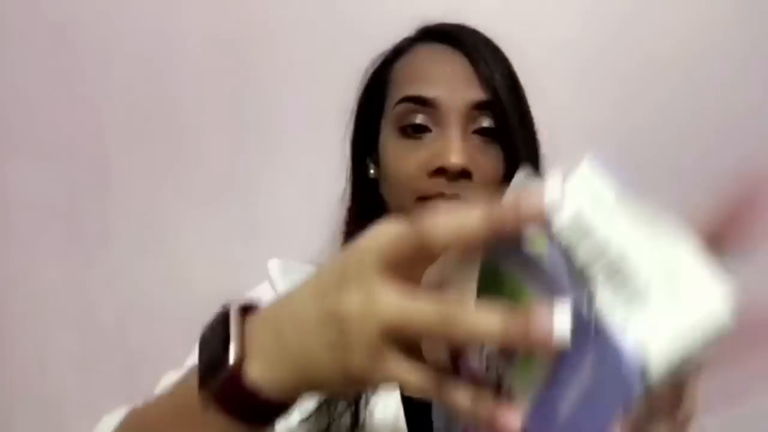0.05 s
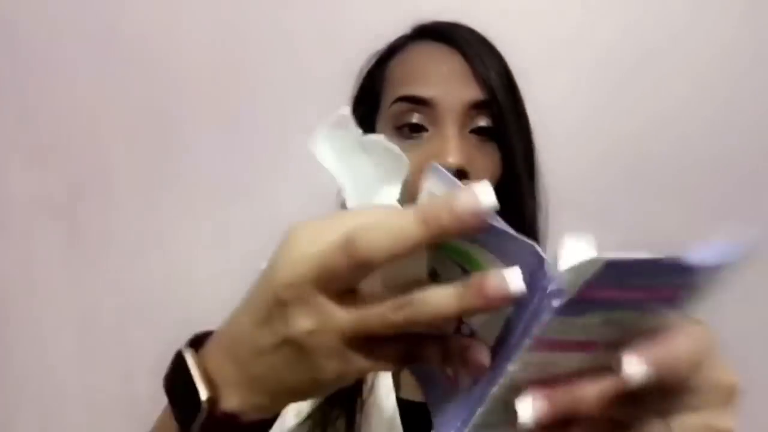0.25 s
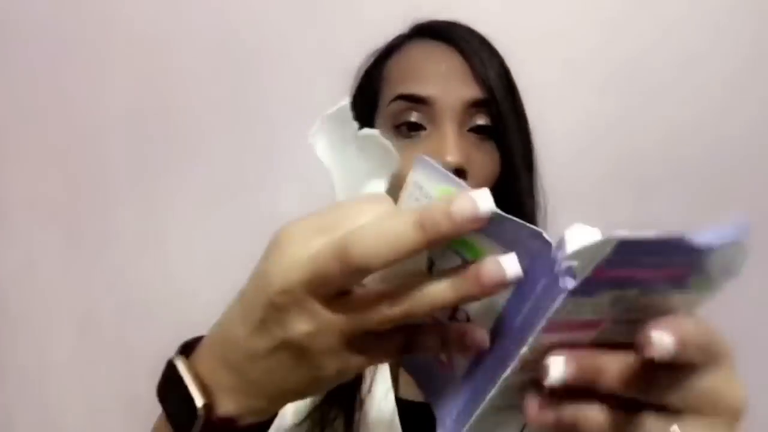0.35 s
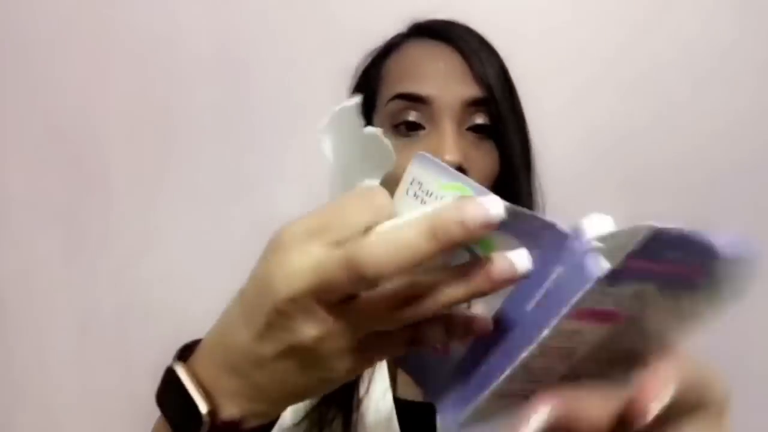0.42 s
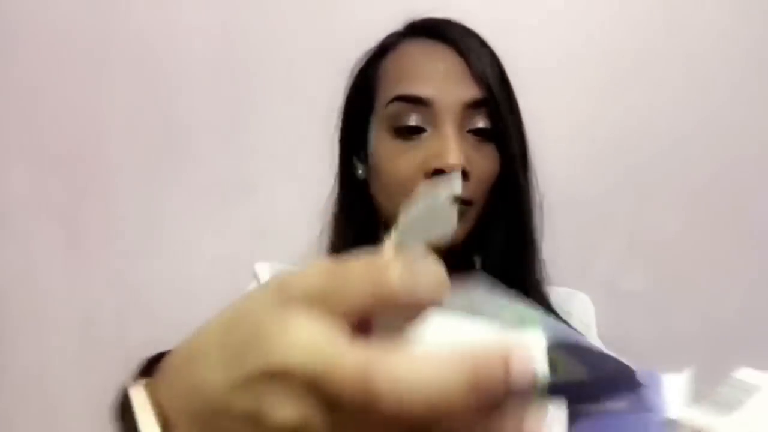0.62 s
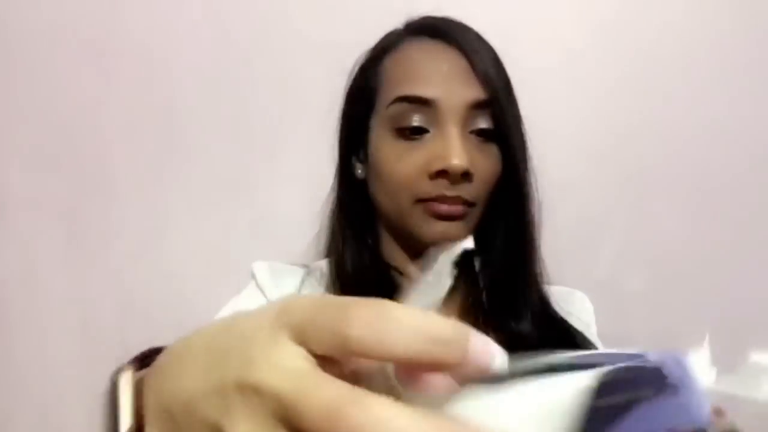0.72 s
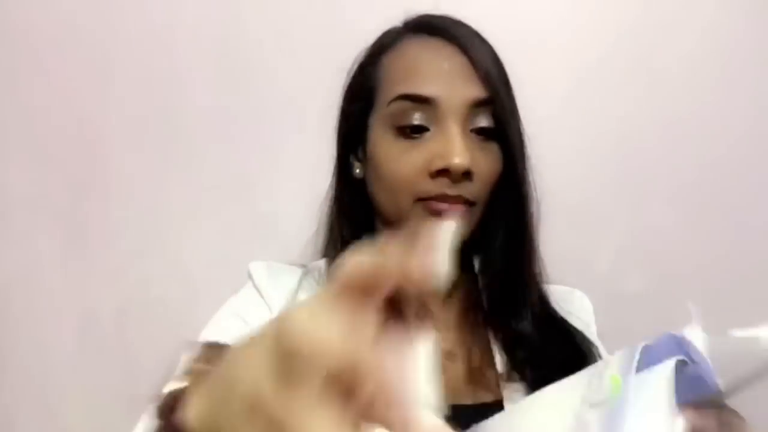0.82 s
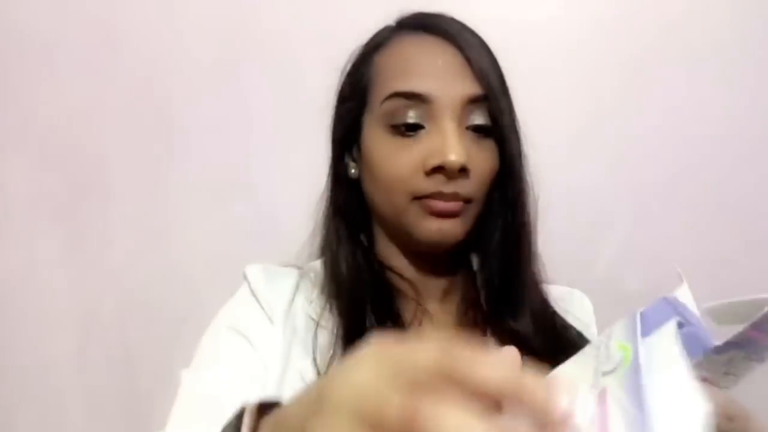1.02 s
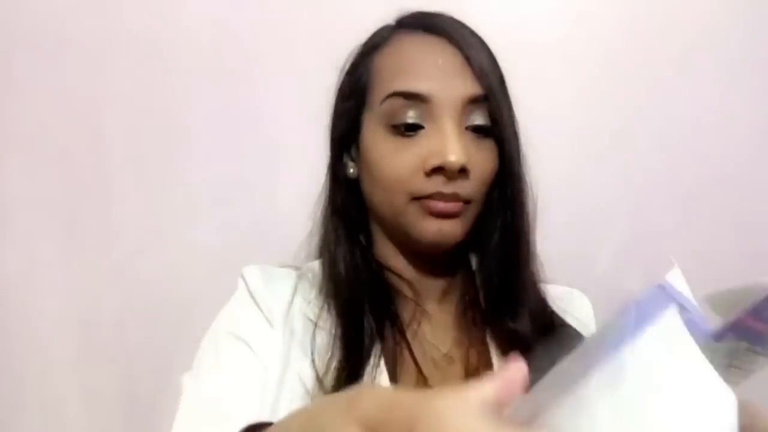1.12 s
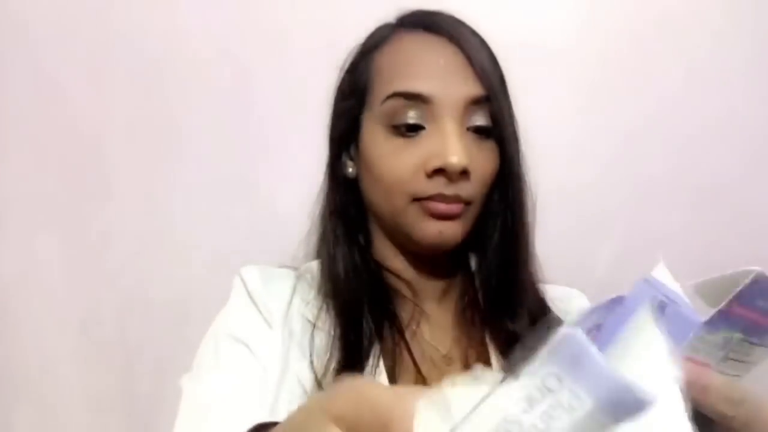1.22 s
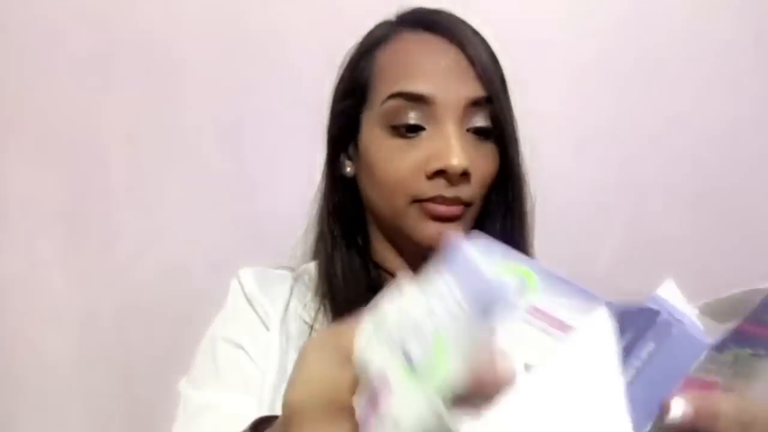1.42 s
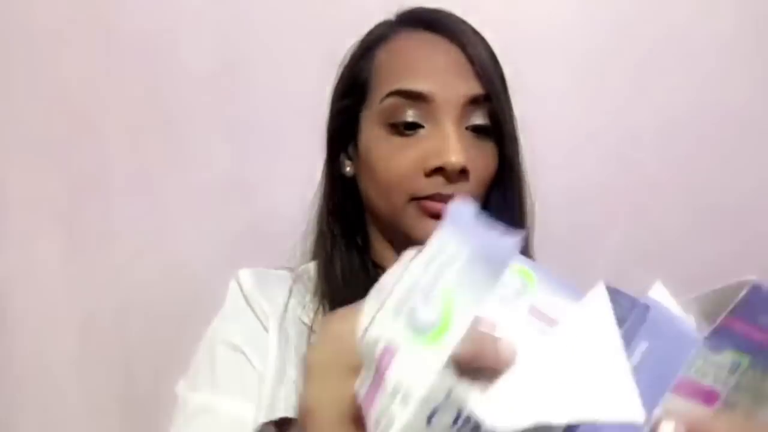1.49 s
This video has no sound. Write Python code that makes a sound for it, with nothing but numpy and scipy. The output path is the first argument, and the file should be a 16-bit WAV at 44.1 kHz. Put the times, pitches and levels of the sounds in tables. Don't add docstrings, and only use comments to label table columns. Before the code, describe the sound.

Thin cardboard carton torn open by hand, one loud snapping pop, then light crinkling and ticks

```python
import sys
import numpy as np
from scipy import signal
from scipy.fft import rfft, irfft, next_fast_len
from scipy.io import wavfile
from scipy.ndimage import uniform_filter1d, map_coordinates

SR = 44100
rng = np.random.default_rng(int(sys.argv[2]) if len(sys.argv) > 2 else 0)


def wav_out(sig):
    wavfile.write(sys.argv[1], SR, np.round(np.clip(np.atleast_2d(sig).T, -1, 1) * 32767).astype(np.int16))


def ratio(d):
    e = np.asarray(d, float) / 20
    return 10 ** e


N = 68355


def unit(x):
    return x / np.sqrt(np.mean(x ** 2) + 1e-20)


def along(points, hz):
    f, v = np.transpose(points)
    return np.interp(np.log(hz + 1), np.log(f + 1), v)


def wobble(rate):
    return map_coordinates(rng.standard_normal(2000), [np.arange(N) * rate / SR])


def filtered(x, response):
    m = next_fast_len(len(x) + 8192)
    return irfft(rfft(x, m) * response(np.fft.rfftfreq(m, 1 / SR)), m)[:len(x)]


def patchy(patchy_db):
    z = signal.stft(rng.standard_normal(N + 512), nperseg=256)[2]
    field = uniform_filter1d(rng.standard_normal(z.shape), 6, axis=0)
    field = uniform_filter1d(field, 8, axis=1)
    return signal.istft(z * ratio(patchy_db * unit(field)), nperseg=256)[1][:N]


def add(track, s, sound):
    track[round(s * SR):][:len(sound)] += sound


def pop():
    # t/s, peak level/dB, f/Hz, held time/s, t60/s
    seam_pops = [
        (0.2148, -10.5, 1103, 0.00215, 0.0013),
        (0.2145, -19, 2406, 0.0023, 0.012),
    ]
    out, t = np.zeros(N + SR), np.arange(1024) / SR
    for s, db, hz, held, t60 in seam_pops:
        decay = ratio(db - 60 * np.maximum(t - held, 0) / t60)
        onset = 1 - np.exp(-t / 0.00048)
        add(out, s, decay * onset * np.sin(2 * np.pi * hz * t))
    return out[:N]


def snaps():
    # t/s, peak level/dB, f/Hz, crack level/dB re flap, t60/s
    breaks = [(0.062, -40, 2120, -18, 0.011), (0.165, -33, 2560, 0, 0.0069), (.1858, -30, 4070, 4, 0.002),
              (0.2142, -12.5, 4670, 0, 0.0082), (0.2238, -15.5, 8250, 3, 0.019),
              (0.2263, -25.5, 4530, -4, 0.03), (0.3083, -25, 3200, -2.5, 0.011),
              (0.4647, -40, 3030, 6, 0.039), (0.5986, -35.5, 2880, -27.5, 0.0078),
              (0.682, -39, 5300, 0, 0.006), (0.802, -37, 3670, -22, 0.0096), (.832, -40, 3830, 6.5, 0.0089),
              (0.863, -40, 6000, -28, 0.0064), (0.8823, -35.5, 3370, -29, 0.014),
              (0.9627, -32, 3950, -6.5, 0.0062), (1.0446, -26.5, 5601, 6.5, 0.0063),
              (1.0516, -29, 2460, -17, 0.007), (1.0659, -33.5, 8250, 5.5, 0.0032),
              (1.087, -38.5, 5070, 0, 0.0081), (1.1727, -28, 5100, 3.5, 0.0089),
              (1.3806, -45, 3330, 9.5, 0.01), (1.4126, -42.5, 2360, -7, 0.0065),
              (1.4875, -51, 1390, 10, 0.023), (1.5286, -32, 2560, -28, 0.0025)]
    # t/s, peak level/dB, f/Hz, crack level/dB re flap, t60/s
    more_breaks = [(0.5317, -42, 8250, 4, 0.0033), (1.2, -47, 2980, 6, .006), (.383, -48, 9000, 0, .008),
                   (0.499, -41, 1480, -4, 0.008), (1.3895, -44, 6500, 1, 0.0081),
                   (1.4255, -50.5, 2300, -26, 0.0075), (.1715, -41, 2200, 3, .012),
                   (.2172, -23.5, 10500, -3, 0.0055), (0.2237, -18, 8600, -22, 0.011),
                   (0.2156, -16, 3400, -9, 0.0066), (.2292, -28, 2300, -8, 0.0051),
                   (0.238, -28, 1500, -7, .008), (0.259, -34, 7000, -12, .006),
                   (0.273, -30.5, 3500, -6, .006), (0.3108, -31.5, 1280, 0, 0.0085),
                   (0.4506, -38.5, 2290, -1, 0.013), (0.4674, -36, 2260, 1, 0.0091),
                   (.645, -47, 1200, -20, .015), (0.6856, -41, 2420, 2, .006),
                   (.7148, -40, 3400, -20, 0.0087), (.723, -42, 3700, -8, .008),
                   (.7315, -46, 3420, -20, .006), (.749, -45, 2300, -24, .005), (.8105, -39, 3900, -6, .01),
                   (.8635, -37, 3198, -8, .006), (0.873, -41, 3800, -20, 0.0054),
                   (.907, -47, 3800, -20, 0.0055), (1.05, -34, 3550, 1, 0.0092), (1.058, -42, 5000, -5, .008),
                   (1.0972, -43, 1500, -10, .006), (1.1095, -42.5, 1700, -10, 0.0056),
                   (1.1154, -43, 2510, -12, .006), (1.1353, -38.5, 1500, -9, 0.0093),
                   (1.1788, -37, 3500, 2, .006), (1.194, -43, 2600, -17, .005),
                   (1.228, -43, 1800, -8, 0.0086), (1.249, -39, 4000, -12, .006), (1.26, -36, 4220, -8, .008),
                   (1.271, -42, 4500, -10, .006), (1.494, -49, 3000, 0, .005), (1.5015, -51, 2400, -6, .005)]
    flap_bandwidth = 0.7
    crack_band = signal.butter(2, [1600, 16500], "band", fs=SR)
    out, t = np.zeros(N + SR), np.arange(1024) / SR
    impulse = 2.6 * (np.arange(len(t)) == 10)
    for s, db, hz, crack_db, t60 in breaks + more_breaks:
        envelope = ratio(-60 * t / t60) * (1 - np.exp(-t / 0.00014))
        burst = (rng.standard_normal((2, len(t))) + impulse) * envelope
        peak = signal.iirpeak(hz, 1 / flap_bandwidth, SR)
        flap = signal.lfilter(*peak, signal.lfilter(*peak, burst[0]))
        crack = signal.lfilter(*crack_band, burst[1])
        add(out, s, ratio(db) * (flap / abs(flap).max() + ratio(crack_db) * crack / abs(crack).max()))
    return out[:N]


def flexes():
    # t/s, peak level/dB, final f/Hz, t60/s
    thumps = [(0.22, -20.5, 1020, 0.0047), (.165, -28, 980, 0.0038), (0.22, -23, 630, 0.016),
              (0.2237, -19, 1040, .012), (0.2276, -27, 1043, 0.02), (.172, -39.5, 1200, 0.0074),
              (.18, -52, 240, 0.1), (0.324, -50, 74, 0.081), (1.177, -40, 2530, 0.034),
              (0.22, -29.5, 199, 0.026), (.3105, -30, 227.5, 0.036), (0.16, -50.5, 90, 0.072),
              (1.315, -56, 120, 0.093), (1.11, -46.5, 745, 0.061), (.647, -52.5, 350, 0.032),
              (0.3093, -33, 790, 0.0114), (.450, -41, 1470, 0.01), (0.45, -38, 685, 0.016),
              (0.4998, -40, 597, 0.017), (1.176, -50.5, 330, 0.026), (0.82, -49, 1020, 0.025),
              (.838, -39.5, 510, 0.01), (0.8836, -40, 960, 0.016), (0.964, -43.5, 990, 0.017),
              (1.07, -42.5, 1184, 0.046), (1.053, -42.5, 376, 0.027), (1.1, -38.5, 890, 0.013),
              (1.114, -46, 1300, 0.025), (1.136, -42, 1150, 0.012), (1.2168, -30.5, 1390, 0.015),
              (1.22, -48, 130, 0.052), (1.31, -39, 323, 0.0098), (1.502, -46, 1030, 0.005),
              (1.5299, -43.5, 346, 0.022)]
    sink, sink_s = 0.83, 0.0012
    roughness = 0.6
    out, t = np.zeros(N + SR), np.arange(8192) / SR
    for s, db, hz, t60 in thumps:
        phase = 2 * np.pi * np.cumsum(hz * (1 + sink * np.exp(-t / sink_s))) / SR
        rough = unit(signal.filtfilt(*signal.iirpeak(hz, 1, SR), rng.standard_normal(len(t))))
        envelope = ratio(db - 60 * t / t60) * (1 - np.exp(-t * hz * 1.51)) * 1.324
        swing = envelope * (np.sin(phase) + roughness * rough)
        add(out, s, signal.lfilter(*signal.butter(2, hz / 2, "high", fs=SR), swing))
    return out[:N]


def slides():
    # peak t/s, rise/s, fall/s, rms level/dB, centre f/Hz
    strokes = [(0.0076, .01, 0.0075, -41.5, 6800), (.02, .02, 0.014, -54, 2300),
               (0.28, 0.0083, 0.013, -44.5, 6600), (.12, 0.008, 0.008, -56.5, 7000),
               (.86, .05, 0.018, -55, 13000), (.47, .05, 0.07, -59, 13400), (1.03, .015, 0.013, -59, 7000),
               (0.31, 0.0089, 0.023, -46, 3050), (0.484, 0.0059, 0.016, -52, 3830),
               (0.558, 0.061, 0.097, -60, 3550), (0.646, 0.013, 0.011, -61.5, 1250),
               (0.726, 0.019, 0.015, -49.5, 3800), (.812, 0.0071, 0.019, -53, 4000),
               (0.862, 0.01, 0.012, -45, 6550), (0.864, 0.01, 0.018, -50, 3530),
               (.92, 0.061, 0.049, -60.5, 3840), (1.19, 0.012, 0.015, -52.5, 2300),
               (1.25, 0.03, 0.019, -49.5, 1420), (1.262, 0.011, 0.008, -43.5, 4080),
               (1.377, 0.0028, .006, -63, 4420), (0.96, 0.0036, 0.011, -54.5, 6600),
               (1.545, 0.0087, .01, -58.5, 2850), (1.7, .004, .015, -59, 12000),
               (1.32, .004, .004, -57, 7300)]
    width, top = 0.24, 6.7
    rough_db = 3
    out, t = np.zeros(N), np.arange(N) / SR
    for s, rise, fall, db, hz in strokes:
        def resonance(f):
            damping = 1j * f * hz * width
            return damping / (hz * hz - f * f + damping) / (1 + (f / (top * hz)) ** 2)

        rub = rng.standard_normal(N) * ratio(rough_db * wobble(500))
        spread = np.where(t < s, rise + 0.00033, fall + 0.00042)
        out += ratio(db) * unit(filtered(rub, resonance)) * np.exp(-0.5 * ((t - s) / spread) ** 2)
    return out


def rustle():
    # t/s, effort level/dB
    handling = [(0, -44), (0.075, -53), (.16, -52), (0.214, -43), (0.218, -14), (0.253, -39),
                (0.435, -50.5), (.548, -53), (.675, -54.5), (.69, -53), (.88, -48), (.958, -57),
                (1.043, -52.5), (1.047, -47.5), (1.28, -52), (1.42, -59), (1.484, -67.5), (1.489, -54.5)]
    # f/Hz, spectral level/dB
    card_colour = [(88, -64), (150, -33), (254, -9.5), (406, -1), (745, -1.5), (1500, -0.5), (1870, -1),
                   (3620, -3), (16000, -7)]
    rustle_db, cap_db = -5, -31.5
    grains_per_s, grain_db = 1500, -5
    spread_db, biggest = 4, 0.03
    s, db = np.transpose(handling)
    effort_db = np.minimum(np.interp(np.arange(N) / SR, s, db), cap_db)

    when, pitch, rank = rng.random((3, int(grains_per_s * N / SR), 1))
    t = np.arange(160) / SR
    hz = 700 * 14 ** pitch
    size = ratio(-spread_db * np.log(rank + biggest))
    grain = size * np.sin(2 * np.pi * hz * t) * np.exp(-t * hz / 3.8) * np.sqrt(hz)
    at = (when * N).astype(int) + np.arange(160)
    ticks = np.bincount(at.ravel(), grain.ravel(), N + 160)[:N]

    colour = lambda hz: ratio(along(card_colour, hz))
    hiss = unit(filtered(patchy(patchy_db=0.5), colour))
    mix = hiss + ratio(grain_db) * unit(filtered(ticks, colour))
    return ratio(effort_db + rustle_db + 1.13 * wobble(25.1)) * mix


def room(x):
    # f/Hz, t60/s
    decay_times = [(150, 0.22), (1000, 0.29), (4000, 0.26), (7000, 0.19), (12000, 0.095)]
    delay_s = 0.0082
    out, step = np.zeros(N + SR), 4096
    for k in range(0, N, step):
        hz, t, z = signal.stft(rng.standard_normal(SR // 2), SR, nperseg=256)
        decay = ratio(-60 * t / along(decay_times, hz)[:, None])
        tail = signal.istft(z * decay, SR, nperseg=256)[1]
        add(out, k / SR + delay_s, signal.fftconvolve(x[k:k + step], tail / np.linalg.norm(tail)))
    return out[:N]


def air():
    # f/Hz, spectral level/dB
    air_colour = [(18, -43), (30, -19.5), (179, -14), (364, -25.5), (1040, -64), (6720, -47), (9460, -55),
                  (10200, -74), (16000, -31)]
    # f/Hz, level/dB
    fan_tones = [(59.2, -67.5), (123.8, -67.5), (247.6, -65.5)]
    t = np.arange(N) / SR
    hum = np.zeros(N)
    for hz, db in fan_tones:
        strength = ratio(db - 2.0 + 1.3 * wobble(8.14))
        hum += strength * np.sin(2 * np.pi * hz * t + 0.9 * wobble(5.93))
    noise = unit(filtered(patchy(patchy_db=1.7), lambda hz: ratio(along(air_colour, hz))))
    return ratio(-64) * noise + hum


def gate(x):
    from_hz, gate_db, scatter_db = 5000, -3, 6
    hz, _, z = signal.stft(x, SR, nperseg=1024)
    bands = np.arange(len(hz)) // 8
    power = np.array([np.mean(abs(z[bands == b]) ** 2, 0) for b in range(bands[-1] + 1)])
    level_db = 10 * np.log10(power / np.median(power, 1)[:, None] + 1e-9)
    chance = uniform_filter1d(rng.standard_normal(power.shape), size=5, axis=1)
    chance = unit(uniform_filter1d(chance, size=2, axis=0))
    reach = np.clip((hz[::8] - from_hz) / 9000, 0, 1)[:, None]
    threshold = gate_db - 12 * (1 - reach) - 99 * (reach == 0)
    shut = 0.25 * level_db + scatter_db * chance < threshold
    gain = np.where(shut & (level_db < 6), 0.12, 1)
    return signal.istft(z * gain[bands], SR, nperseg=1024)[1][:N]


def scene():
    carton = pop() + snaps() + flexes() + slides() + rustle()
    return (carton + ratio(-11) * room(carton) + air())[None]


def roll_off(x):
    return signal.sosfilt(signal.butter(12, 16480, fs=SR, output="sos"), x)


def record(dry):
    # f/Hz, level/dB
    mic_response = [(200, 1), (5000, 0.5), (10000, -4.5), (13000, -8), (16000, -9)]

    def response(hz):
        low_cut = 1 / (1 + (52 / (hz + 1)) ** 4)
        shelf = np.where(hz < 15800, 1, ratio(-30))
        return ratio(along(mic_response, hz)) * shelf * (hz < 16400) * low_cut

    return roll_off(gate(filtered(dry[0], response))[None])


dry = scene()
out = record(dry)
wav_out(out)
```